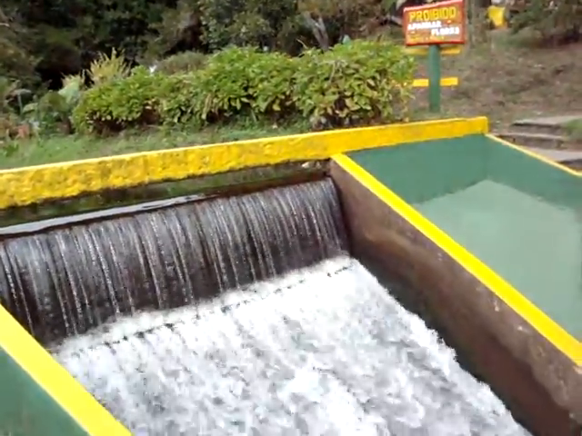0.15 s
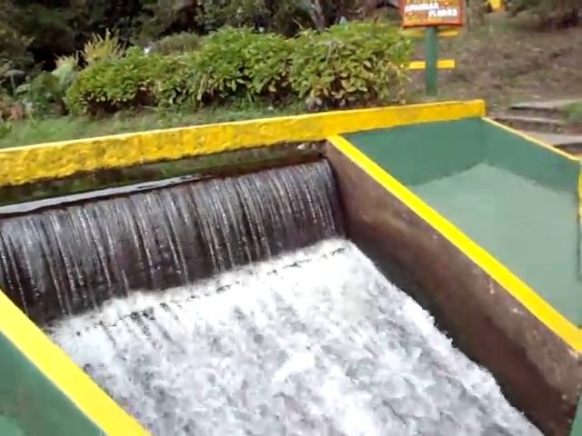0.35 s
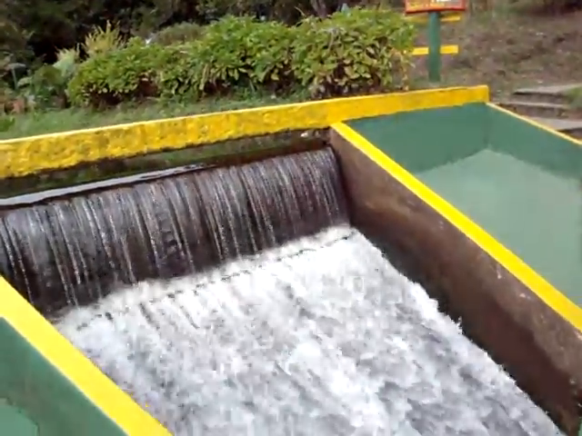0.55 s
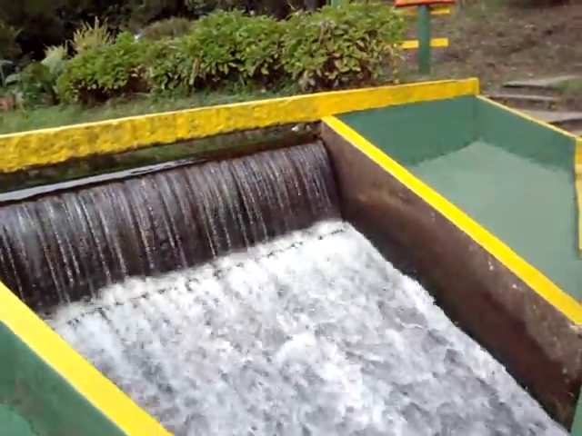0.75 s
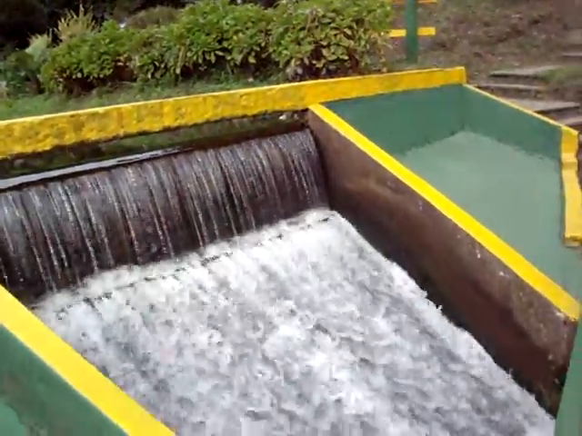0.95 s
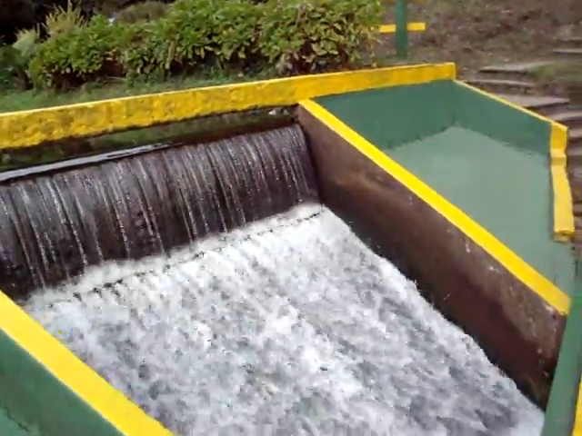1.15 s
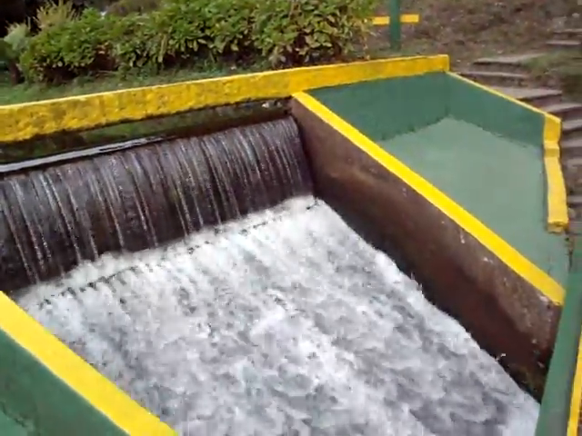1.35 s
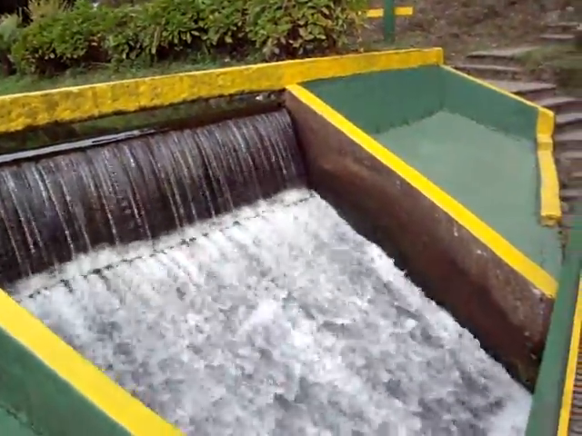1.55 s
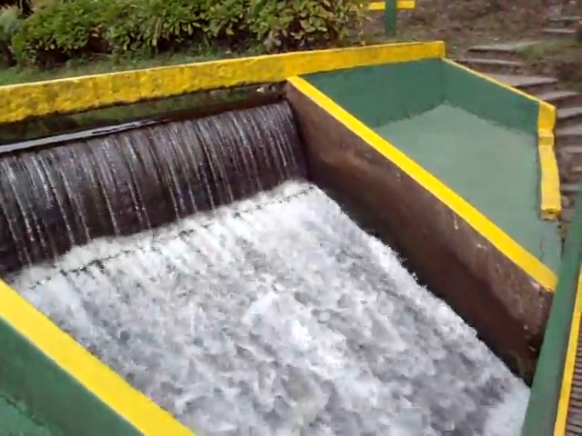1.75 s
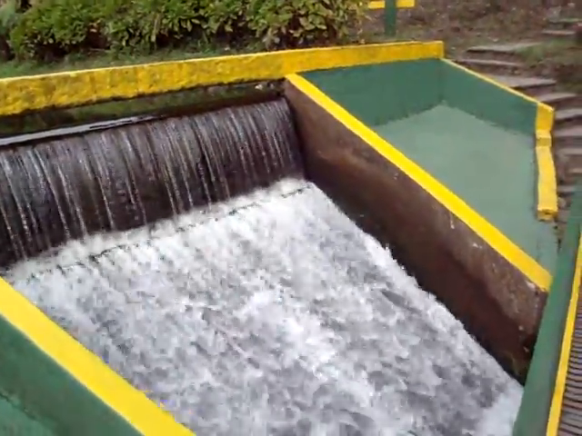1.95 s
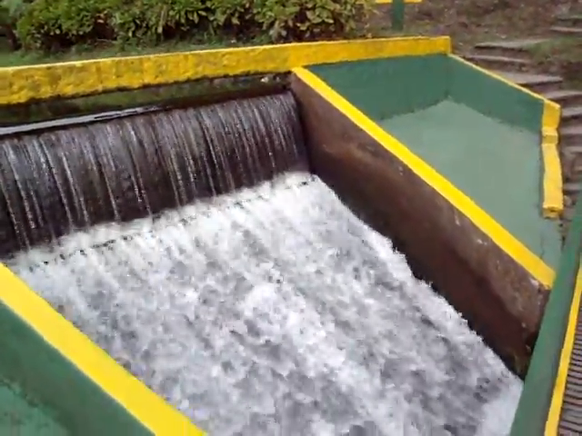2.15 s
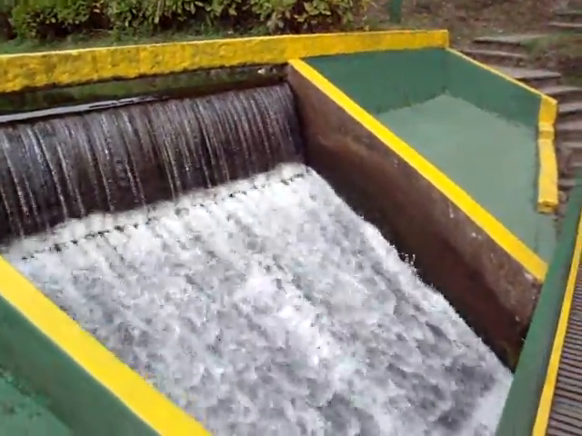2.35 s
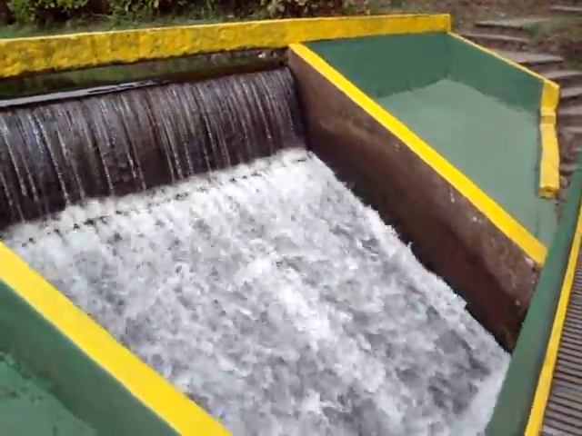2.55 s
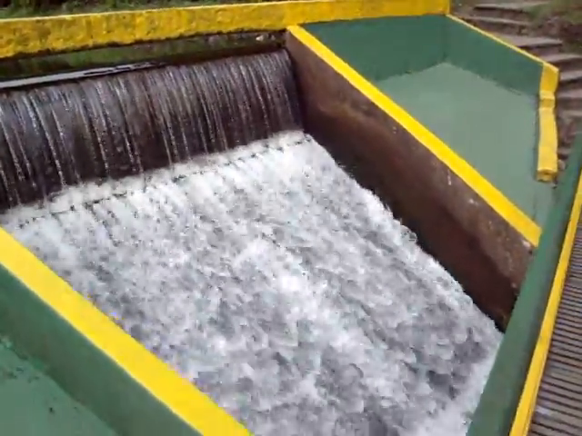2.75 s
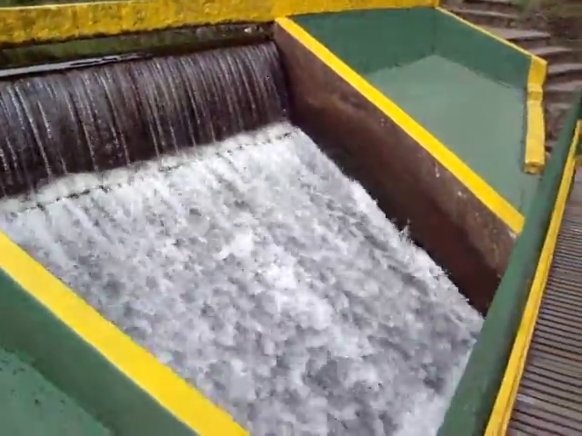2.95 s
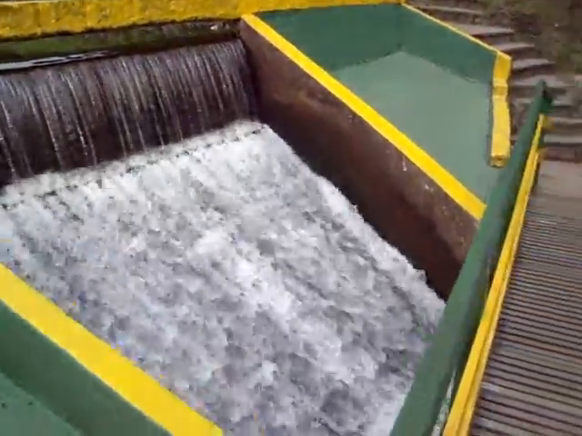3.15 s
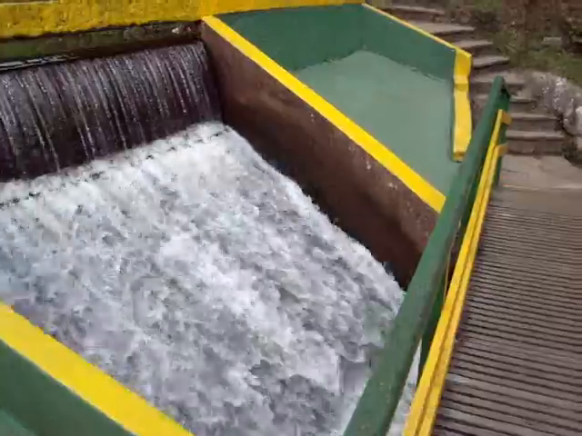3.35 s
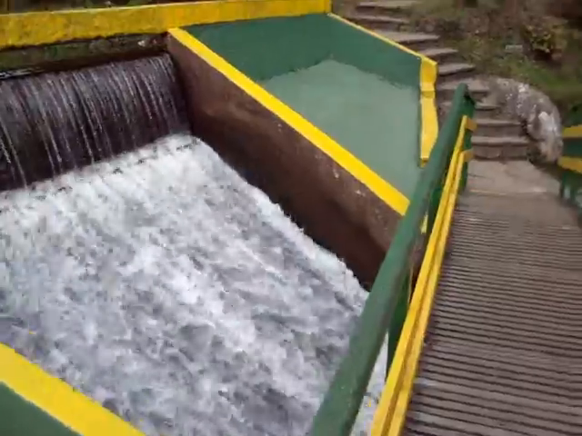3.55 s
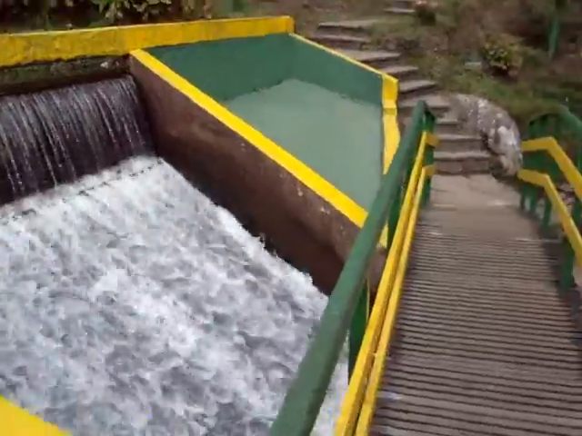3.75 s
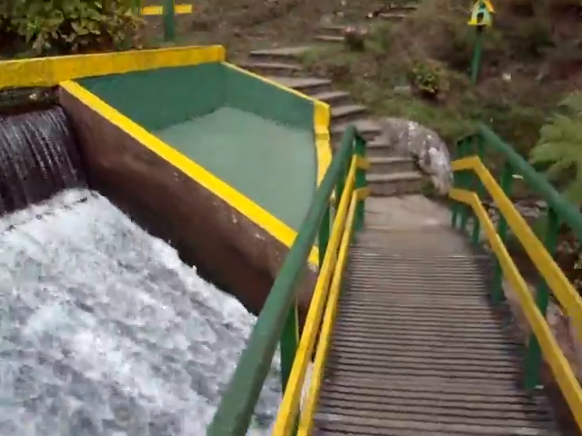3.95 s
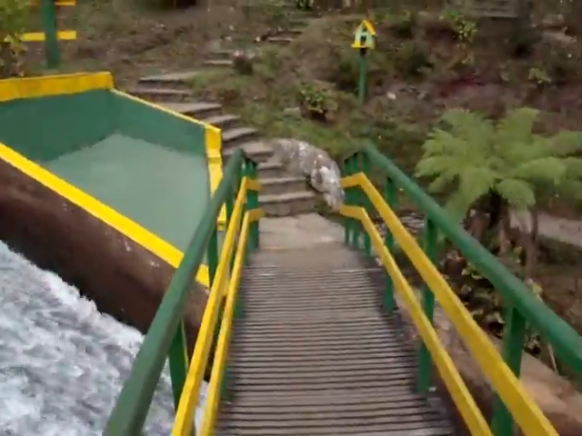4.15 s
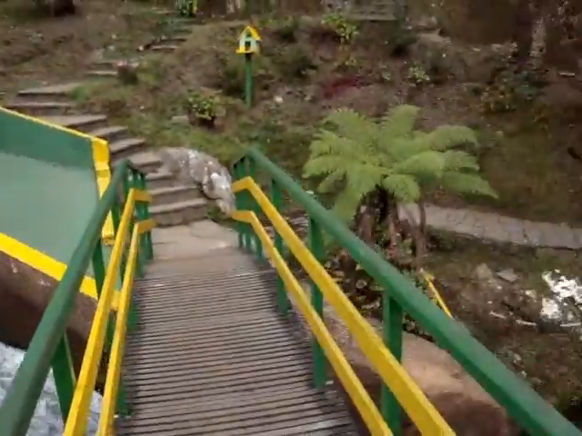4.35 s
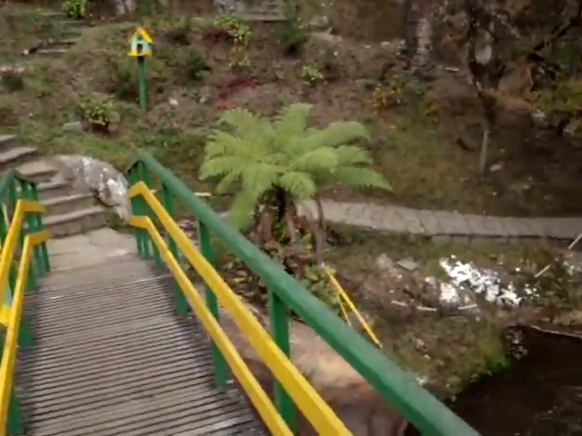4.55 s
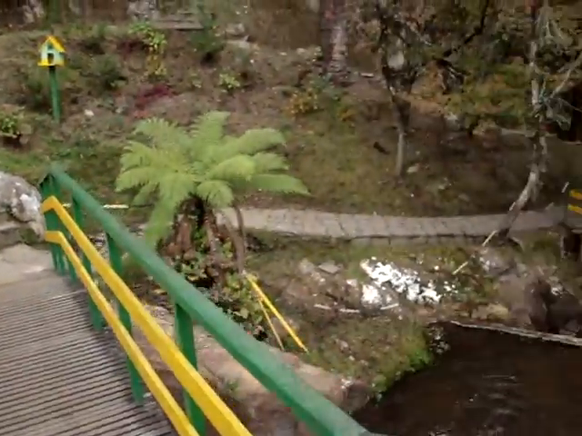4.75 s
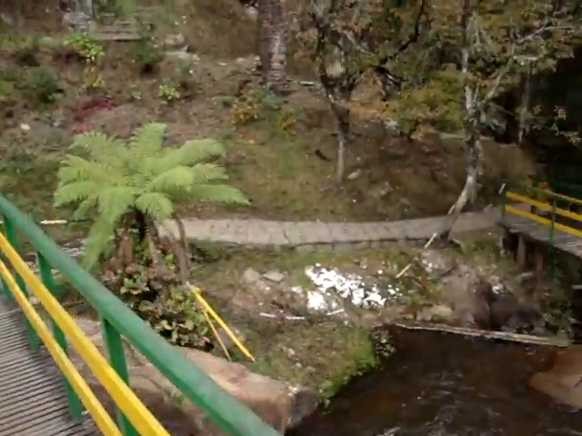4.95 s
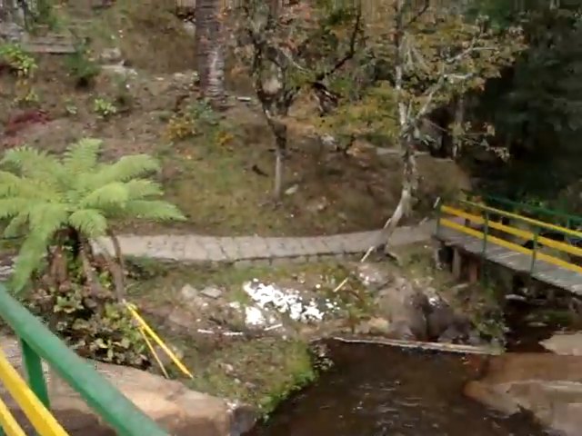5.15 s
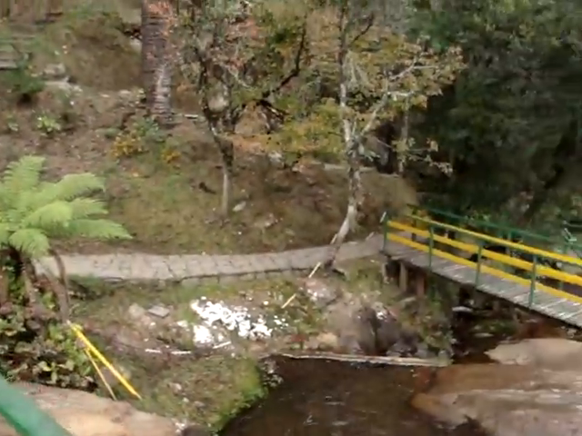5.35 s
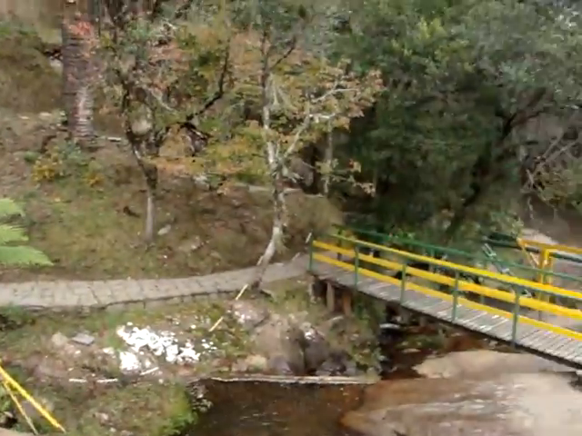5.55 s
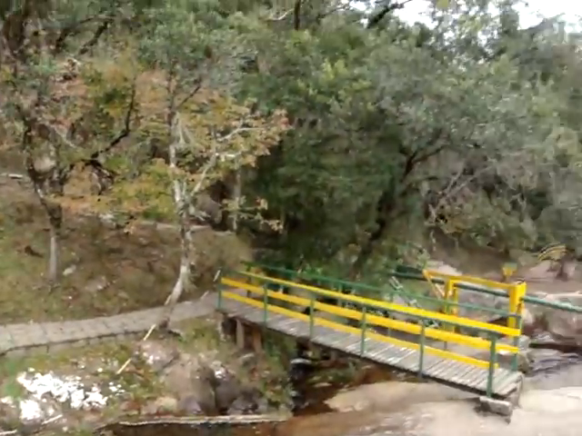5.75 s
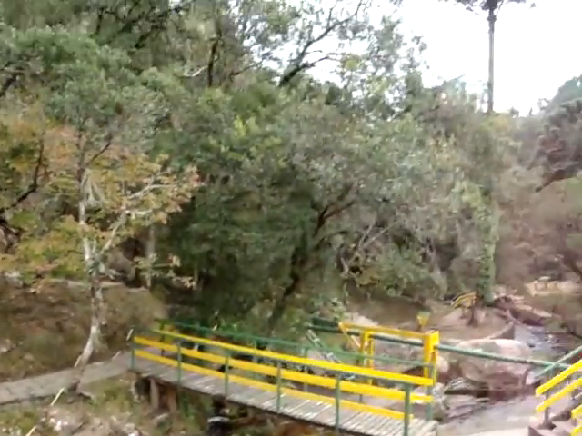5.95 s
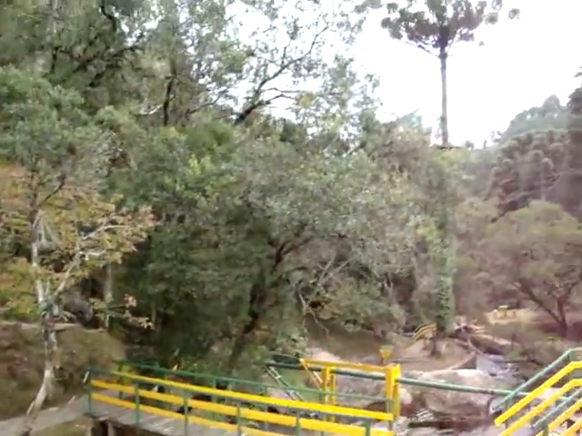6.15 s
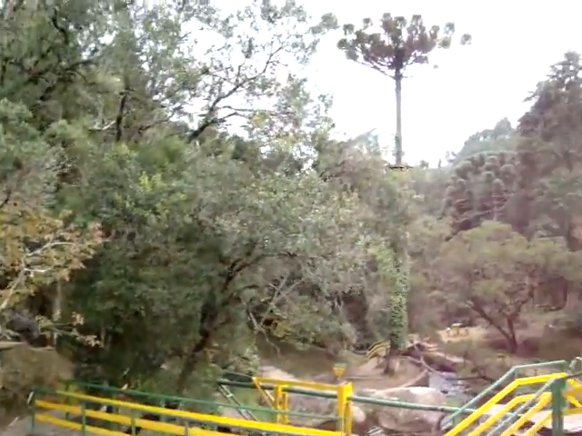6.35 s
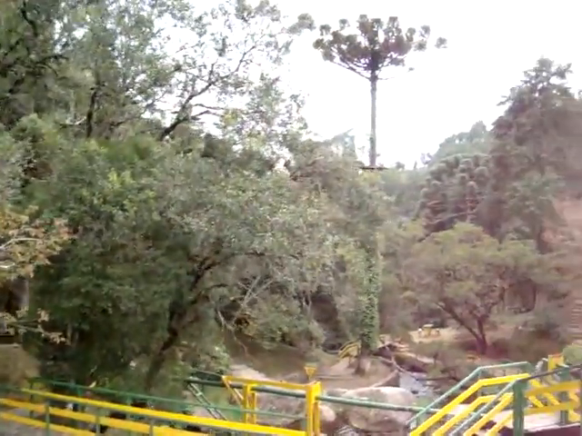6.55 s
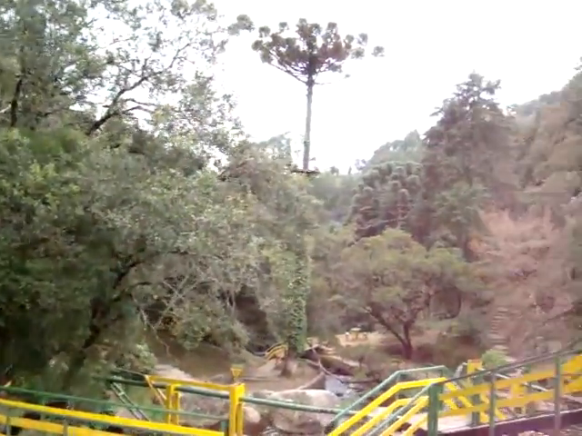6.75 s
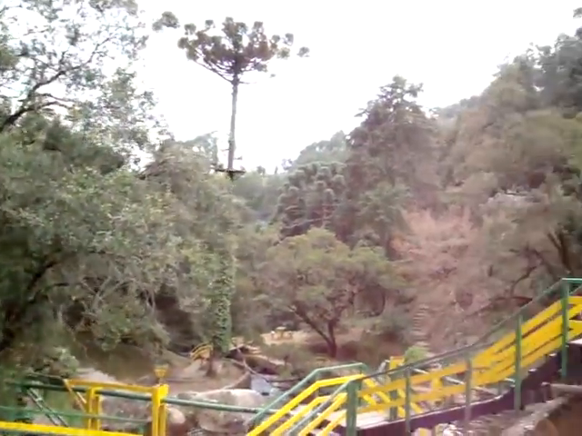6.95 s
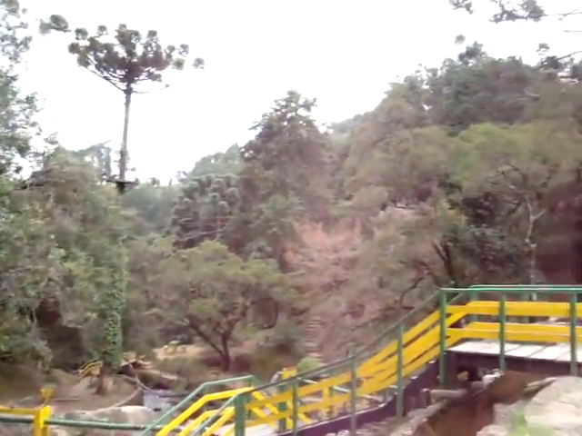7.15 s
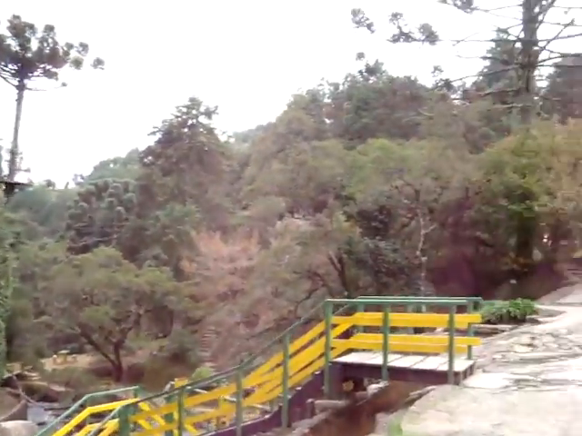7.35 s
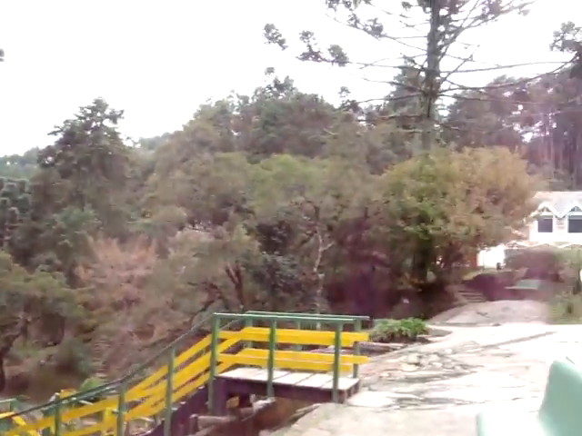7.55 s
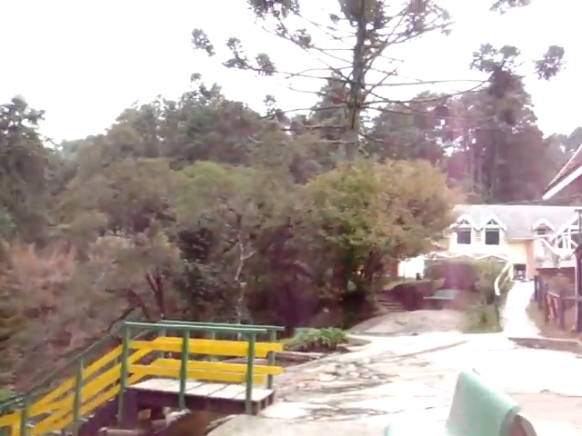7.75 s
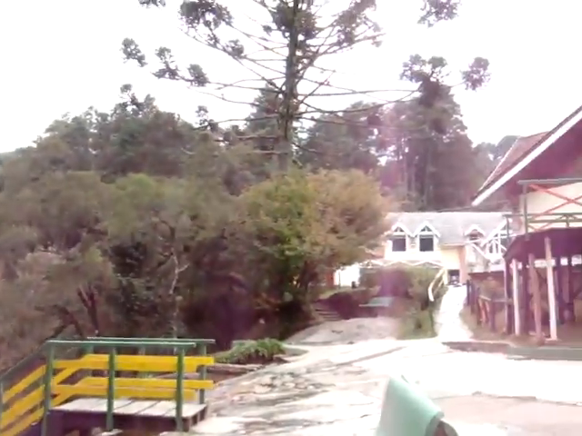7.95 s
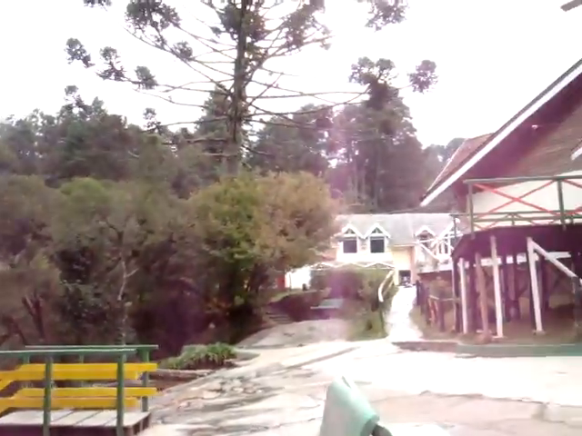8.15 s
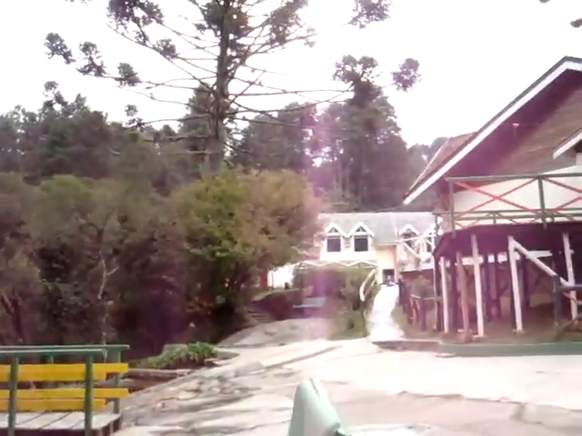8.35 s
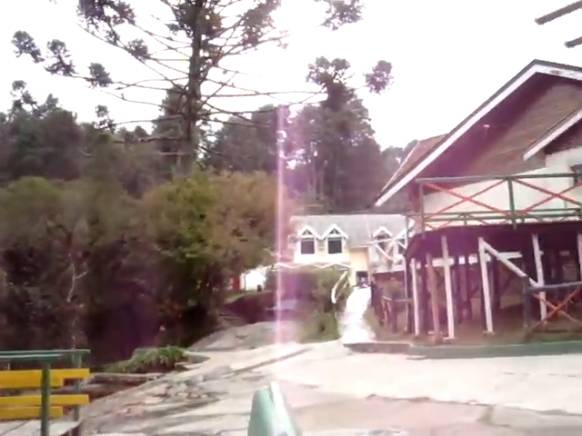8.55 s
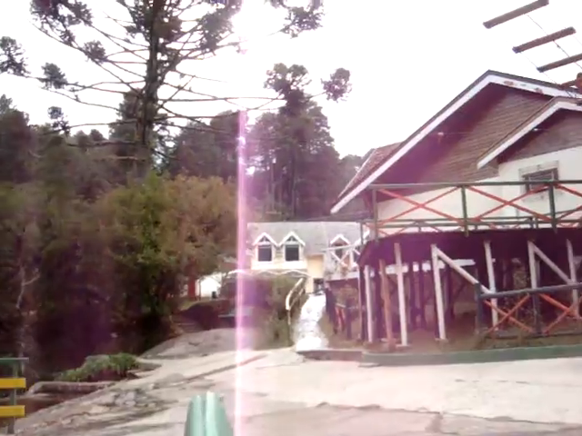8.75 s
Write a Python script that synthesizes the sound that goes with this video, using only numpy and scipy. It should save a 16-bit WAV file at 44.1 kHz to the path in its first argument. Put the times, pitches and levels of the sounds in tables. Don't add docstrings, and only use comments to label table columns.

```python
import sys
import numpy as np
from scipy import signal
from scipy.fft import rfft, irfft, next_fast_len
from scipy.io import wavfile
from scipy.ndimage import uniform_filter1d, minimum_filter1d

SR = 44100
rng = np.random.default_rng(int(sys.argv[2]) if len(sys.argv) > 2 else 0)


def field_ratio(decibels):
    return 10 ** (np.asarray(decibels, dtype=float) / 20)


def to_wav(s):
    ch = np.atleast_2d(s).T
    pcm = np.round(np.clip(ch, -1, 1) * 32767)
    wavfile.write(sys.argv[1], SR, pcm.astype(np.int16))


N = 388080


def unit(x):
    return x / np.sqrt(np.mean(x ** 2) + 1e-20)


def filtered(x, response):
    m = next_fast_len(N + 8192)
    spectrum = rfft(x, m) * response(np.fft.rfftfreq(m, 1 / SR))
    return irfft(spectrum, m)[..., :N]


def colour(points):
    f, level_db = np.transpose(points)
    return lambda hz: field_ratio(np.interp(np.log(hz + 1), np.log(f), level_db))


def resonances(modes):
    def response(f):
        total = 0
        for k, (centre, width, db) in enumerate(modes):
            damping = 1j * f * width
            total = total + (-1) ** k * field_ratio(db) * damping / (centre * centre - f * f + damping)
        return total
    return response


def churn(patchy_db, size):
    z = signal.stft(rng.standard_normal(N), nperseg=512)[2]
    field = uniform_filter1d(rng.standard_normal(z.shape), size[0], 0)
    field = uniform_filter1d(field, size[1], 1)
    return unit(signal.istft(z * field_ratio(patchy_db * unit(field)), nperseg=512)[1][:N])


def shading():
    # t/s, shading/dB
    turning_away = [(0, 0.5), (.6, 0), (2.2, 0), (3.2, -1), (4.2, 0.35), (5.4, 3), (5.9, 5.5), (6.6, 8.5),
                    (7.1, 12.5), (7.6, 16.5), (8.1, 18), (8.8, 19.5)]
    return np.interp(np.arange(N) / SR, *np.transpose(turning_away))


def spray(shade_db):
    # f/Hz, level/dB per Hz
    sheet_spectrum = [(710, -30.5), (1200, 3), (1370, -6.5), (1480, -1.5), (2650, 1), (6110, -3),
                      (9580, -10), (10000, -11), (10300, -55), (13400, -42), (22000, -120)]
    sheet = filtered(churn(patchy_db=0.24, size=(30, 20)), colour(sheet_spectrum))
    return field_ratio(-28 - shade_db) * unit(sheet)


def roar(shade_db):
    # f/Hz, level/dB per Hz
    bank_spectrum = [(40, -70), (80, -39), (130, -18), (250, -6), (360, -2), (450, -1), (650, -1),
                     (1000, -3), (1600, -4.5), (1900, -7.5), (3000, -13), (5600, -19), (9500, -29),
                     (10300, -43), (22000, -120)]
    bends_db = 54.5
    reflected = filtered(churn(patchy_db=0.7, size=(3, 30)), colour(bank_spectrum))
    return field_ratio(-28.5 - shade_db ** 2 / bends_db) * unit(reflected)


def foam():
    crowd = bubbles(810, spread=0.386, cycles=8.0, count=6000)
    return churn(patchy_db=0.5, size=(4, 20)) + field_ratio(-15) * crowd


def bubbles(centre_hz, spread, cycles, count):
    draw, t = rng.random((count, 3)), np.arange(600) / SR
    hz = centre_hz * np.exp(spread * rng.standard_normal((count, 1)))
    life = t * hz / cycles
    envelope = life * np.exp(-3 * life)
    rings = envelope * np.sin(2 * np.pi * hz * t * (1 + 0.099 * life))
    rings *= field_ratio(-1.5 * np.log(draw[:, 1:2]))
    where = (draw[:, :1] * N).astype(int) + np.arange(len(t))
    return unit(np.bincount(where.ravel(), rings.ravel(), N + len(t))[:N])


def channel_ring(excitation, shade_db):
    # f/Hz, width/Hz, level/dB
    channel_modes = [
        (586, 194, -3.5),
        (953, 240, 0),
        (1160, 157, -3.5),
    ]
    response = resonances(channel_modes)
    ring = filtered(filtered(excitation, response), response)
    return field_ratio(-33 - 0.76 * shade_db) * unit(ring)


def bridge_boom(excitation, shade_db):
    # f/Hz, width/Hz, level/dB
    bridge_modes = [
        (264, 43, -5),
        (409, 104, -2),
        (676, 157, 0.5),
    ]
    along_s, along_width_s = 4.48, 1.1
    t = np.arange(N) / SR
    along_db = 11 * np.exp(-((t - along_s) / along_width_s) ** 2)
    response = resonances(bridge_modes)
    boom = filtered(filtered(excitation, response), response)
    return field_ratio(-44 - 0.17 * shade_db + along_db) * unit(boom)


def weir():
    shade_db, excitation = shading(), foam()
    spray_and_roar = spray(shade_db) + roar(shade_db)
    return spray_and_roar + channel_ring(excitation, shade_db) + bridge_boom(excitation, shade_db)


def gulps():
    # t/s, f/Hz, peak level/dB, length/s
    air_pockets = [
        (7.63, 370.5, -36, 0.068),
        (7.915, 364, -28, 0.014),
    ]
    t = np.arange(N) / SR
    total = np.zeros(N)
    for s, hz, db, length in air_pockets:
        swell = np.exp(-((t - s) / length * 2) ** 2)
        total += field_ratio(db) * swell * np.sin(2 * np.pi * hz * t)
    return total


def microphone_noise():
    # f/Hz, level/dB per Hz
    hum_spectrum = [(15, -14), (60, -8), (110, 3), (170, -2.5), (400, -40), (22000, -120)]
    return field_ratio(-65.5) * unit(filtered(rng.standard_normal(N), colour(hum_spectrum)))


def scene():
    return np.tile(weir() + gulps() + microphone_noise(), (2, 1))


def starved(x, weak, from_hz, size=128):
    n, k = np.arange(2 * size), np.arange(size)
    window = np.sin(np.pi * (n + .5) / (2 * size))
    basis = window * np.cos(np.pi / size * np.outer(k + .5, n + .5 + size / 2))
    padded = np.pad(x, (size, 2 * size - len(x) % size))
    z = np.lib.stride_tricks.sliding_window_view(padded, 2 * size)[::size] @ basis.T
    band = (k + 1) // 3
    cell = z ** 2 @ (band[:, None] == band)
    usual = uniform_filter1d(cell, size=60, axis=0)
    held = minimum_filter1d(cell / usual, size=3, axis=0) < weak / 5
    treble = k * SR / (2 * size) > from_hz
    kept = ~(((cell < weak * usual) | held) & treble)
    blocks = (z * kept) @ basis * 2 / size
    return (blocks[1:, :size] + blocks[:-1, size:]).ravel()[:len(x)]


def swapped(x):
    # t/s, low edge f/Hz
    noise_bands = [(0.259, 5700), (0.305, 5200), (0.398, 4700), (0.723, 5500), (1.025, 7200), (1.164, 4700),
                   (1.164, 6900), (1.629, 8100), (2.07, 6600), (2.581, 6300), (3.3, 4200), (4.02, 4200),
                   (5.042, 5700), (5.715, 4200), (5.901, 5200), (6.389, 4400), (6.389, 6300), (7.41, 5700),
                   (8.13, 5700), (8.153, 4200), (8.177, 4700), (8.177, 5800), (8.177, 7200), (8.432, 4200),
                   (8.618, 6300)]
    frame, span = 2048, 1.23
    out, window, hz = x.copy(), np.hanning(frame) ** 1.3, np.fft.rfftfreq(frame, 1 / SR)
    for s, low_hz in noise_bands:
        centre = round(s * SR)
        part = slice(centre - frame // 2, centre + frame // 2)
        band = (hz > low_hz) & (hz < span * low_hz)
        old = irfft(rfft(x[:, part]) * band)
        new = irfft(rfft(rng.standard_normal((2, frame))) * band)
        out[:, part] += window * (field_ratio(2.0) * np.std(old) * unit(new) - old)
    return out


def roll_off(x):
    return signal.sosfilt(signal.butter(12, 11260, fs=SR, output="sos"), x)


def record(dry):
    mono = starved(dry[0], weak=.25, from_hz=4950)
    limited = filtered(np.tile(mono, (2, 1)), lambda hz: hz < 10180)
    mix = swapped(limited)
    return roll_off(mix)


dry = scene()
out = record(dry)
to_wav(out)
```